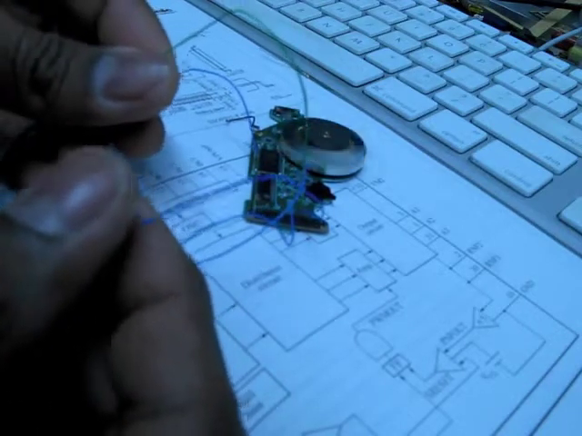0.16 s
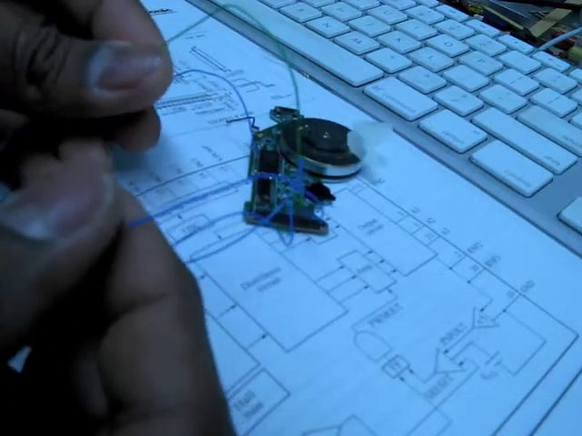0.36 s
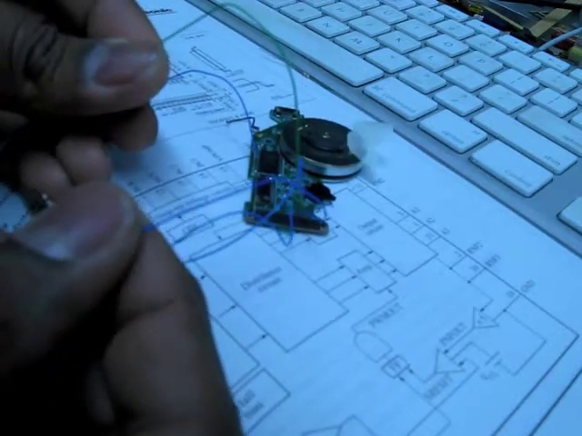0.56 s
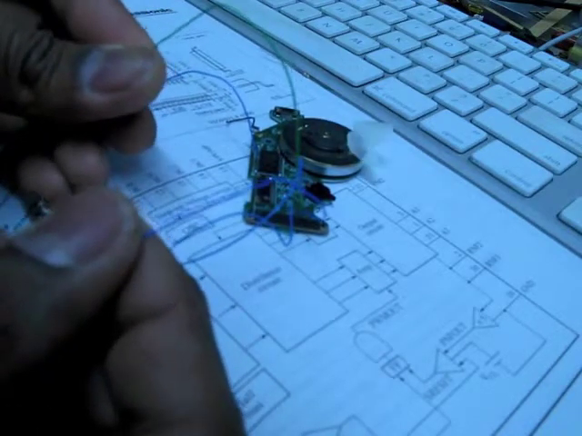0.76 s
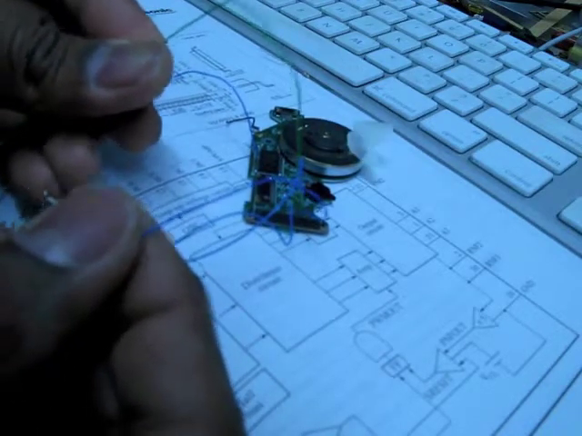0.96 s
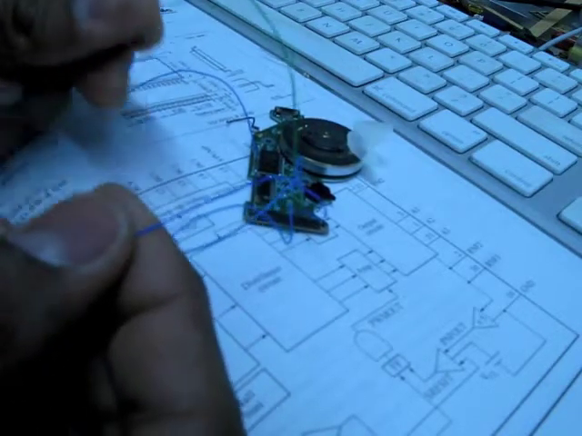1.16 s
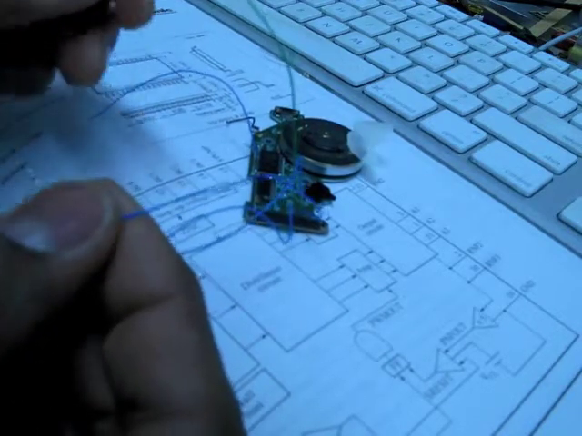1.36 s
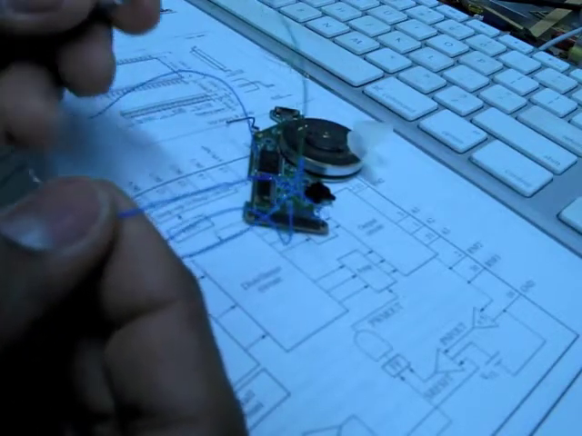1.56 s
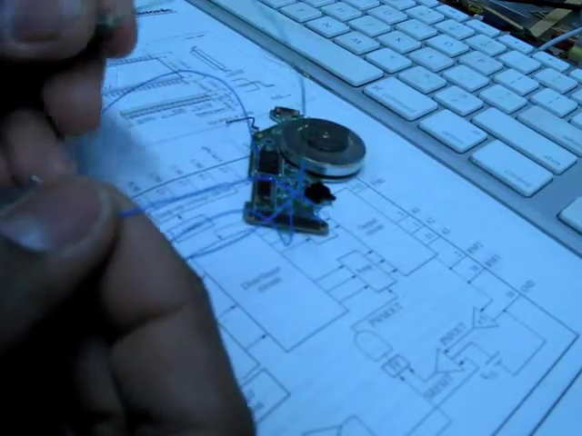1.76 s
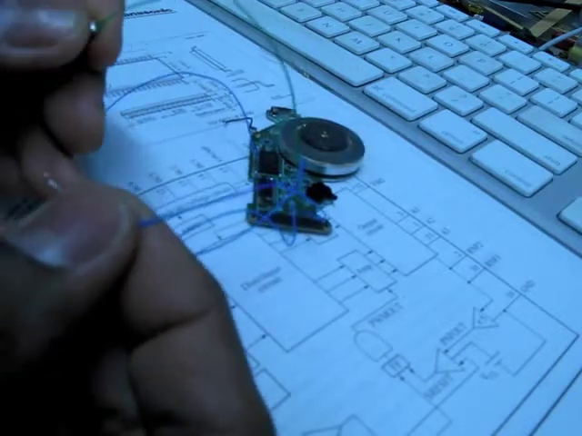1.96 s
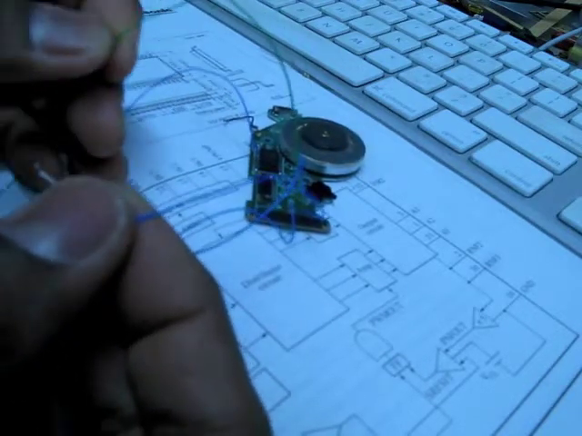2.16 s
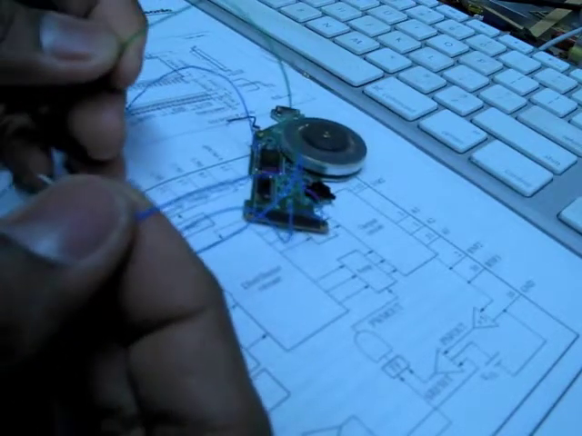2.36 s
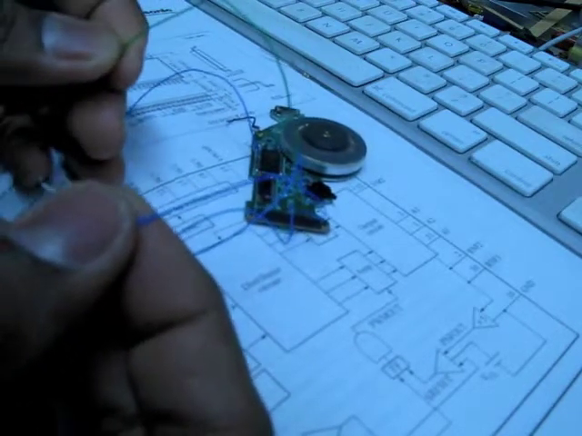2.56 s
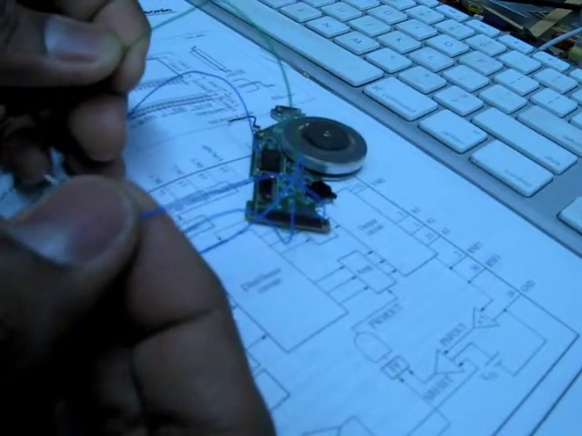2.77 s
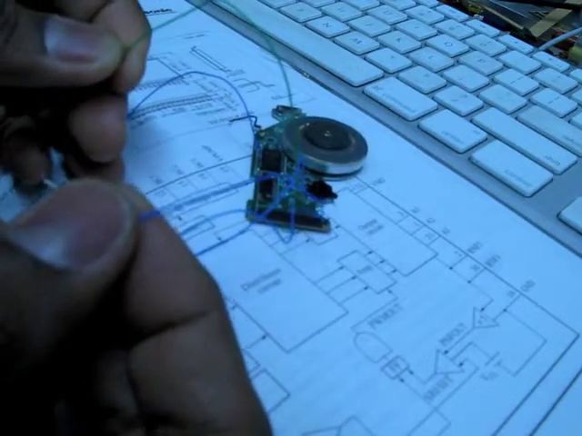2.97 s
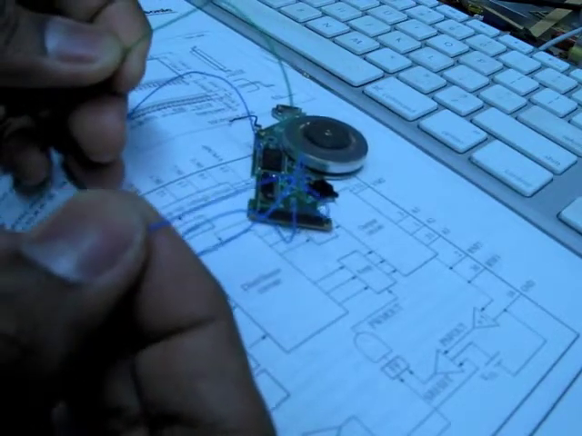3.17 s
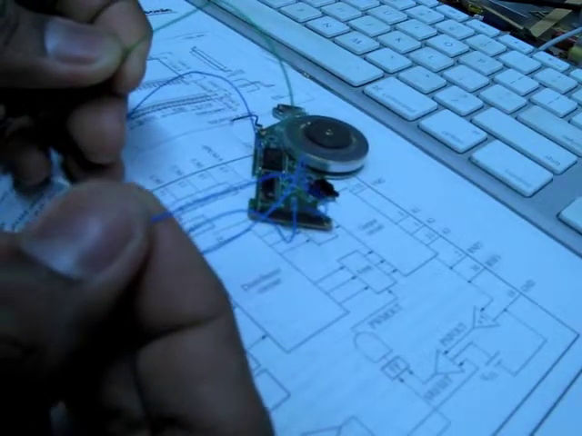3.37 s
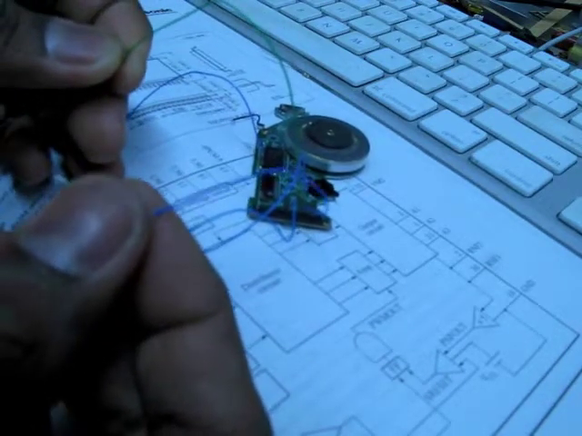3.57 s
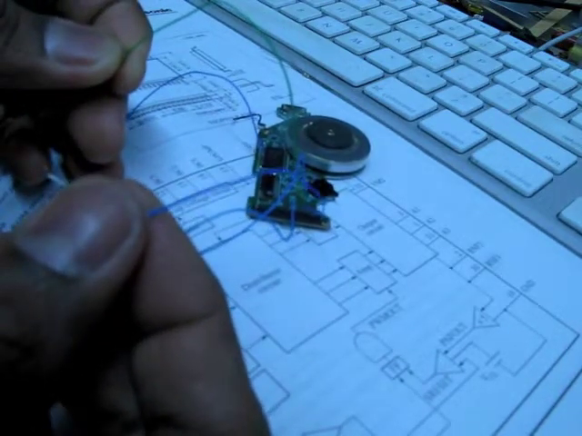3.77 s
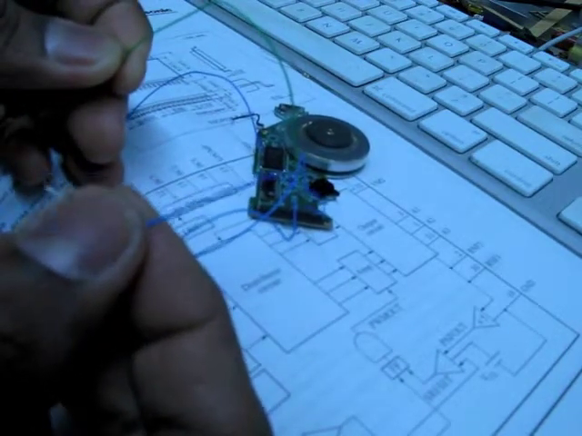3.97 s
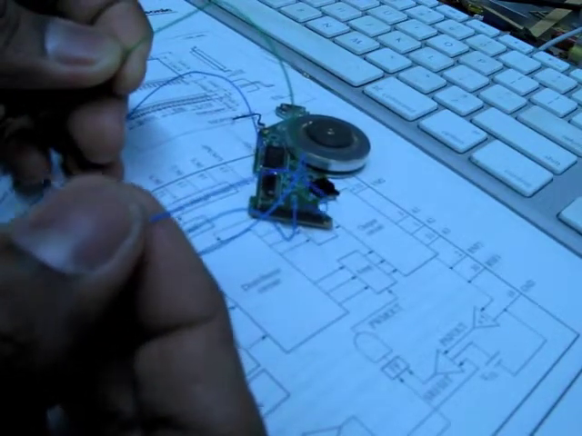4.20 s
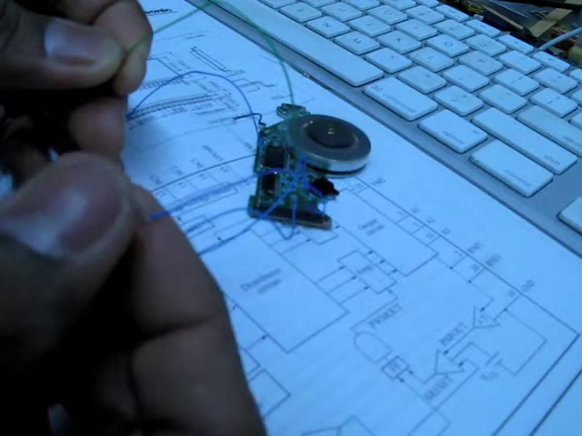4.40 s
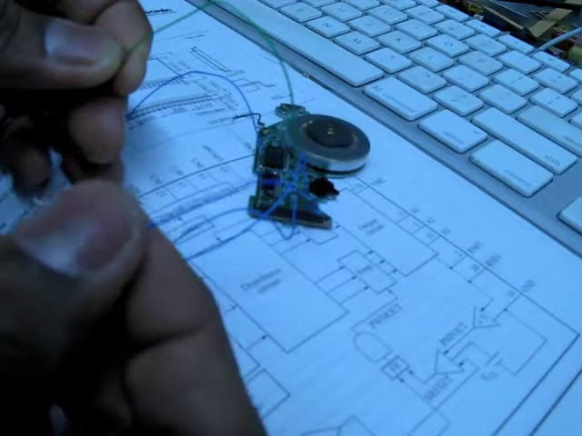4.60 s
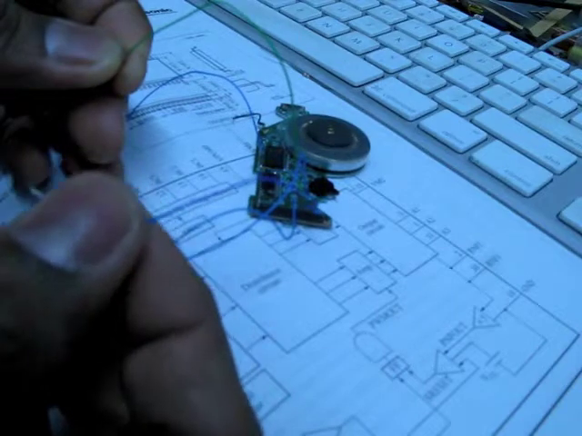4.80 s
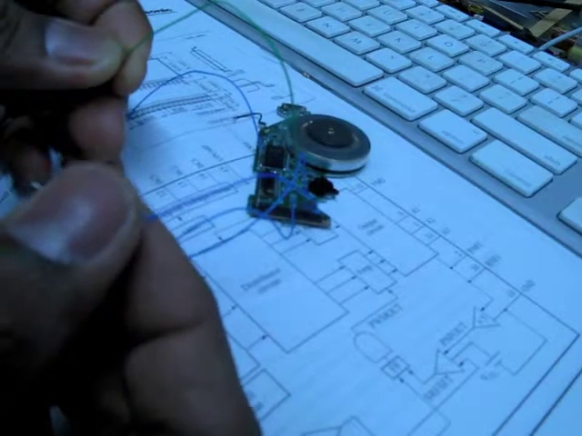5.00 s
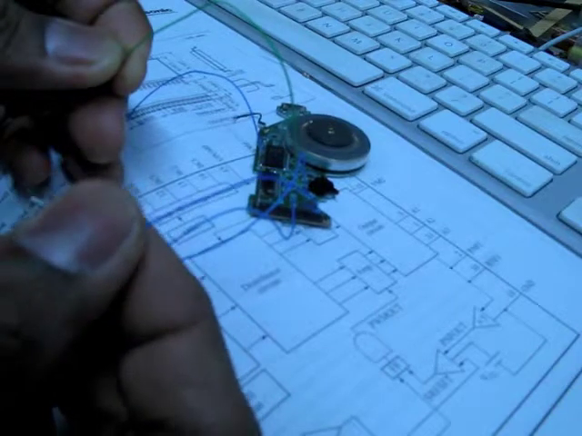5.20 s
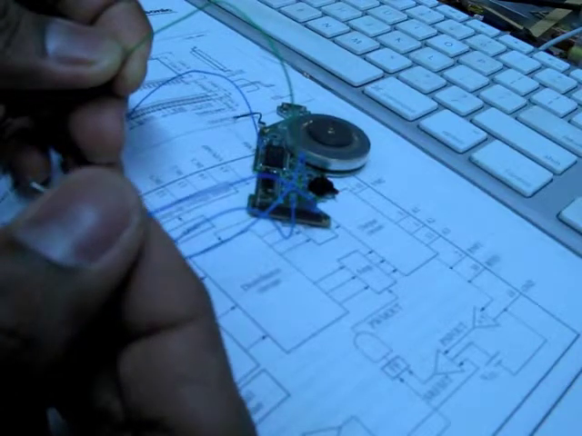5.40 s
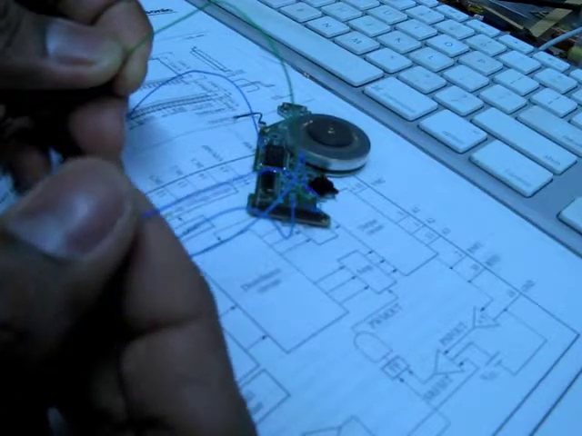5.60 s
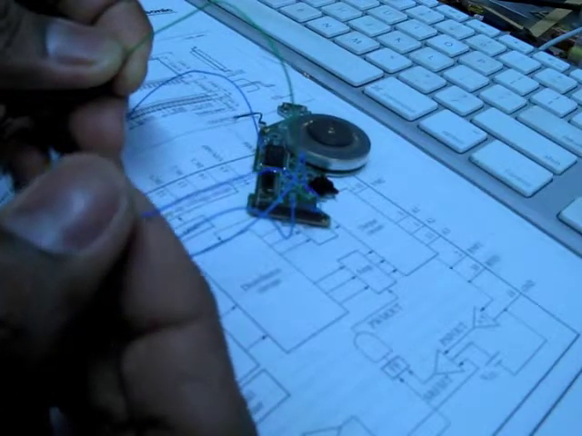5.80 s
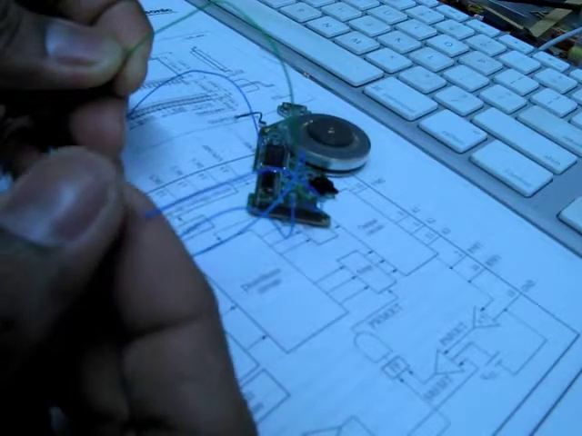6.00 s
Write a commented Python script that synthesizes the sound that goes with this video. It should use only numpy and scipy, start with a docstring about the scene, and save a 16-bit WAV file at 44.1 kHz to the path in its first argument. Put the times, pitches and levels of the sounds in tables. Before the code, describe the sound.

After faint wire ticks, a tiny motor spins up with a thin, high whine, cutting out briefly and restarting three times.

```python
"""A brushless motor fed through a hand-held wire

A small spindle motor on a desk makes four short runs and coasts in between. Cogging and commutation
whine at shaft orders, whole multiples of the rotation rate. The driver's current edges excite the
rotor's resonances, chiefly near 11 kHz: in a pattern that repeats each turn while it pulls at speed,
as a ragged sizzle while it sags. Fingers and wire tick faintly, and the small room hums softly."""
import sys
import numpy as np
from scipy import signal
from scipy.fft import rfft, irfft, next_fast_len
from scipy.io import wavfile
from scipy.ndimage import uniform_filter1d, map_coordinates

SR = 44100
rng = np.random.default_rng(int(sys.argv[2]) if len(sys.argv) > 2 else 0)


def to_wav(s):
    """Save 16-bit WAV."""
    ch = np.atleast_2d(s).T  # columns
    pcm = np.round(np.clip(ch, -1, 1) * 32767)  # PCM
    wavfile.write(sys.argv[1], SR, pcm.astype(np.int16))


N = 266805

# The runs, while the wire makes contact.
# Each row: start in seconds, stop in seconds, cogging gain in dB, commutation gain in dB.
RUNS = [(1.743, 2.286, -59, -54.5), (2.382, 3.525, -56, -56.5), (3.807, 4.285, -58, -57),
        (4.498, 6.2, -58, -56.5)]
# The spectrum of drive and bearing hiss. Each row: frequency in Hz, relative spectral density in dB.
HISS_SPECTRUM = [(300, -19), (800, -5), (1500, -3), (3200, 2), (5000, -1.5), (6800, 1.5), (9300, -2.5),
                 (12800, -7), (15500, -6)]


def motor():
    """Rotating machine noise: ring, hiss and whine need current; bearing and rotor hum need only motion."""
    speed, in_step = shaft()
    jitter = 0.00088 + 0.00196 * (1 - in_step)  # share of the speed, larger out of step
    turns = np.cumsum(speed * (1 + jitter * wobble(60))) / SR
    pace = speed / speed.max()
    ring = rotor_ring(turns, speed, pace, in_step)
    hiss = drive_hiss(turns, in_step)
    spinning = bearing(pace) + rotor_hum(turns, pace)
    powered = sum(contact(start, stop) for start, stop, _, _ in RUNS)
    return powered * (whine(turns, pace, in_step) + ring + hiss) + spinning


def shaft():
    """Inertia: speed relaxes toward each new target. Gives turns a second and lock to the drive, 0 to 1."""
    # The driver falls into step and pulls.
    # Each row: start in seconds, target in turns a second, time constant in seconds.
    pulls = [(1.731, 98.6, 0.099), (2.445, 98.6, 0.137), (2.976, 93.0, 0.027), (3.305, 95.7, 0.064),
             (3.806, 88.0, 0.278), (3.875, 94.8, 0.081), (4.496, 94.5, 0.081), (5.032, 94.5, 0.149)]
    # The driver loses step and the shaft sags. Each row: start in seconds, target in turns a second.
    slips = [(2.199, 82.2), (2.381, 86.2), (2.756, 87.2), (3.377, 84.0), (4.14, 82.8), (4.813, 84.1),
             (5.461, 83.5)]
    sag_s, coast_s, lock_s = 0.122, 1.06, 0.027  # two time constants; time to find or lose step
    max_acceleration = 435  # turns a second per second, at the driver's current limit
    changes = [(start, target, lag, 1) for start, target, lag in pulls]
    changes += [(start, target, sag_s, 0) for start, target in slips]
    changes += [(stop, 0, coast_s, 0) for _, stop, _, _ in RUNS]
    speed, in_step = np.zeros(N), np.zeros(N)
    for start, target, lag, locked in sorted(changes):
        i = round(start * SR)
        if i < N:
            reach = max_acceleration * lag  # a larger gap closes linearly, a smaller one exponentially
            gap = np.sinh((target - speed[i]) / reach) * np.exp(-np.arange(N - i) / SR / lag)
            speed[i:] = target - reach * np.arcsinh(gap)
            in_step[i:] = locked
    return np.abs(speed), np.clip(uniform_filter1d(in_step, size=round(lock_s * SR) + 1), 0, 1)


def contact(start, stop, ramp_s=0.0084):
    """Gating of the current: 1 while the wire touches and 0 otherwise, with short ramps."""
    t = np.arange(N) / SR
    return np.clip(np.minimum(t - start, stop - t) / ramp_s + 0.5, 0, 1)


def rotor_ring(turns, speed, pace, in_step):
    """Forced vibration: current edges, part periodic and part random, excite the rotor's modes."""
    # The rotor's modes. Each row: frequency in Hz, width in Hz, gain in dB.
    rotor_modes = [(6080, 700, -18), (7835, 315, -10.5), (11136, 755, -1.5), (15360, 480, -8)]
    # Critical speeds, where strong switching orders meet those modes.
    # Each row: speed and half width in turns a second, swell in dB when in step.
    critical_speeds = [(94.17, 1.84, 5.5), (82, 5.9, 1)]
    regular = filtered(switching(turns), lambda hz: modal_response(hz, rotor_modes))
    regular /= np.sqrt(np.abs(uniform_filter1d(regular ** 2, size=2048)) + 1e-9)  # hold the level even
    bursts = amp(2.4 * wobble(600) + 2.0 * np.sin(2 * np.pi * turns))  # uneven, yet following the shaft
    ragged = unit(filtered(bursts * rng.standard_normal(N), lambda hz: modal_response(hz, rotor_modes)))
    # The pattern forms as the shaft gathers speed, and settles only in step near full speed.
    regular_share = np.interp(speed, [62, 75, 90, 95], [0, 0.4, 0.4, 0.6])
    regular_share += in_step * np.interp(speed, [82, 91, 95], [0, 0.48, 0.3])
    ring = np.sqrt(regular_share) * regular + np.sqrt(1 - regular_share) * ragged
    swell_db = sum(db * np.exp(-((speed - centre) / width) ** 2) for centre, width, db in critical_speeds)
    swell_db *= amp(-6.5 * (1 - in_step))  # about half as many decibels out of step
    return amp(-39 + swell_db) * (pace + 0.017) ** 0.55 * ring


def switching(turns, size=8192, count=180):
    """Periodic excitation: current edges at the same shaft angles on every turn give a line spectrum."""
    # The strongest switching lines. Each row: shaft order, level in dB above an ordinary line.
    strong_orders = [(81, 7), (84, 16), (115, 9), (116, 16), (117, 5), (118, 6), (119, 13), (120, 7)]
    k = np.arange(count)
    strength = (k > count // 3) * np.where(k % 6 == 0, 2, 1.0)  # six poles a turn stand out
    for order, db in strong_orders:
        strength[round(order)] = amp(db)
    one_turn = irfft(strength * np.exp(2j * np.pi * rng.random(count)), size)
    return unit(np.interp(turns % 1, np.arange(size) / size, one_turn))


def whine(turns, pace, in_step):
    """Resonance: magnetic tones swell as they cross the bracket's modes, and little bass is radiated."""
    # The lines of cogging, commutation, passing magnet poles and a rotor that lags its drive.
    # Each row: shaft order, base level in dB.
    cogging_lines = [(17, -8), (18, -1.3)]
    commutation_lines = [(36, 0), (54, -8), (72, -3), (108, -10)]
    pole_lines = [(24, -69.5), (30, -62), (42, -60.5), (48, -62), (60, -63), (66, -64), (78, -65),
                  (90, -66), (138, -72)]
    lag_lines = [(54, -67.5), (90, -61)]
    # The modes of the motor's bracket. Each row: frequency in Hz, width in Hz, gain in dB.
    bracket_modes = [(1506, 13, 9.5), (1682, 20, 0.5), (2040, 390, 3.5), (2775, 38, -1), (3220, 100, 0.5),
                     (3430, 160, -2.5), (4290, 85, 2.5), (4950, 250, -2.5), (5810, 80, 6), (5930, 520, 3),
                     (5980, 81, 3), (7700, 130, 15)]
    slip = 1 - in_step
    cogging = sum(amp(db) * contact(start, stop) for start, stop, db, _ in RUNS)
    commutation = sum(amp(db) * contact(start, stop) for start, stop, _, db in RUNS)
    commutation *= amp(0.5 * (1 - pace) - 7 * slip)  # a slow rotor draws more current; weaker out of step
    tones = cogging * pace ** 2 * order_tones(cogging_lines, turns, flutter_db=0.5)
    tones += commutation * order_tones(commutation_lines, turns, flutter_db=0.9)
    tones += amp(-4 * slip) * pace ** 2 * order_tones(pole_lines, turns, flutter_db=2.5)
    tones += slip * order_tones(lag_lines, turns, flutter_db=2.0)

    def radiation(hz, cutoff_hz=1350):
        bass_loss = np.sqrt(1 + (cutoff_hz / (hz + 1)) ** 24)
        return (1 + np.abs(modal_response(hz, bracket_modes))) / bass_loss

    return filtered(tones, radiation)


def drive_hiss(turns, in_step):
    """Amplitude modulation: the powered motor's hiss flickers, and pulses once a turn."""
    hiss = noise(HISS_SPECTRUM)
    flicker = amp(1.6 * wobble(700) + 0.47 * np.sin(2 * np.pi * turns))
    return amp(-47 - in_step) * unit(hiss * flicker)


def bearing(pace):
    """Broadband bearing noise, its amplitude growing as the square of the speed."""
    return amp(-50) * pace ** 2 * noise(HISS_SPECTRUM)


def rotor_hum(turns, pace):
    """Periodic forcing: unbalance gives a low hum, and nine stator teeth a faint higher tone."""
    # The spinning rotor's tones. Each row: shaft order, level in dB at full speed.
    rotor_lines = [(1, -68), (2, -69.5), (9, -68)]
    return pace ** 4 * order_tones(rotor_lines, turns, flutter_db=-2.4)


def ticks():
    """Damped transients: fingers, wire and starting rotor give noise bursts that decay exponentially."""
    # Ticks and scuffs. Each row: start in seconds, initial level in dB, centre in Hz, T60 in seconds.
    touches = [(.407, -59, 13500, .015), (.979, -59, 13500, .02), (1.005, -53, 13000, .03),
               (1.07, -51, 12000, .04), (1.084, -55.5, 3000, 0.6), (1.38, -57, 13000, .08),
               (1.513, -57, 13500, .05), (1.615, -57, 14000, .04), (1.739, -44, 11000, 0.016),
               (1.785, -38, 4500, .016), (1.826, -39, 2600, .02), (1.85, -46, 2500, 0.013),
               (2.21, -52.5, 760, 0.99), (4.497, -37, 11000, 0.025)]
    out, t = np.zeros(N + SR), np.arange(SR // 4) / SR
    for start, db, centre, t60 in touches:
        burst = unit(filtered(rng.standard_normal(len(t)), lambda hz: resonance(hz, centre, 1.8 * centre)))
        out[round(start * SR):][:len(t)] += amp(db - 60 * t / t60) * burst
    return out[:N]


def reverberation(x):
    """Diffuse reflection: the walls add a noise-like tail that lasts longest in the bass."""
    # The room's reverberation times. Each row: frequency in Hz, T60 in seconds.
    decay_times = [(200, 0.32), (2000, 0.18), (12000, 0.23)]
    hz, t, spectrum = signal.stft(rng.standard_normal(SR // 2), SR, nperseg=256)
    decay = amp(-60 * t / along(decay_times, hz)[:, None])
    tail = signal.istft(spectrum * decay, SR, nperseg=256)[1]
    impulse_response = np.pad(tail, (150, 0)) / np.linalg.norm(tail)  # 3.4 ms behind the direct sound
    return signal.fftconvolve(x, impulse_response)[:N]


def room_tone():
    """Ambient noise: a gently wavering continuous spectrum of air, with the lines of mains hum."""
    # The room's air noise. Each row: frequency in Hz, relative spectral density in dB.
    air_spectrum = [(15, -63), (25, -41), (91, -8), (104, -6), (122, -4), (144, -4), (227, -3.5),
                    (399, -3.5), (582, -4), (666, -3), (970, -5.5), (1530, -7.5), (1950, -8.5),
                    (12500, -20.5), (15500, -27.5)]
    # Mains harmonics. Each row: frequency in Hz, level in dB.
    mains_lines = [(120, -70), (240, -70.5)]
    t = np.arange(N) / SR
    hum = sum(amp(db) * np.sqrt(2) * np.sin(2 * np.pi * (hz * t + rng.random())) for hz, db in mains_lines)
    return amp(-51.88 + 0.54 * wobble(6.5)) * noise(air_spectrum) + hum


def order_tones(lines, turns, flutter_db):
    """Harmonic series: sines on multiples of the shaft angle, each fluttering in level on its own."""
    tones = np.zeros(N)
    for order, db in lines:
        gain = amp(db + flutter_db * wobble(40))
        tones += gain * np.sin(2 * np.pi * (round(order) * turns + rng.random()))
    return np.sqrt(2) * tones


def modal_response(hz, modes):
    """Superposition: the complex responses of the modes add."""
    return sum(amp(db) * resonance(hz, centre, width) for centre, width, db in modes)


def resonance(hz, centre, width):
    """Two equal damped resonators in cascade, each width Hz wide: a causal peak with steep skirts."""
    return (1j * hz * width / (centre ** 2 - hz ** 2 + 1j * hz * width)) ** 2


def noise(spectrum):
    """Spectral shaping: white noise becomes coloured noise of rms 1."""
    return unit(filtered(rng.standard_normal(N), lambda hz: amp(along(spectrum, hz))))


def filtered(x, response):
    """Linear filtering: the spectrum of x is multiplied by a function of frequency."""
    size = next_fast_len(len(x) + SR // 2)
    return irfft(rfft(x, size) * response(np.fft.rfftfreq(size, 1 / SR)), size)[:len(x)]


def wobble(rate):
    """Random modulation: a smooth curve through rate Gaussian values a second."""
    return map_coordinates(rng.standard_normal(int(N * rate / SR) + 4), [np.arange(N) * rate / SR])


def along(points, hz):
    """Interpolation of (Hz, value) points on a logarithmic frequency axis."""
    frequencies, values = np.transpose(points)
    return np.interp(np.log(hz + 1), np.log(frequencies + 1), values)


def amp(db):
    """Decibels as an amplitude ratio."""
    return 10 ** (np.asarray(db) / 20)


def unit(x):
    """Normalisation to rms 1."""
    return x / np.sqrt(np.mean(x ** 2) + 1e-20)


def scene():
    """Direct and reverberant fields of the nearby motor and wire add to the quiet room's own noise."""
    direct = motor() + ticks()
    return (direct + amp(-12.3) * reverberation(direct) + room_tone())[None]


def record(dry):
    """Band limiting: an ideal low-pass filter removes the highest treble."""
    top_hz = 15760
    return np.array([filtered(channel, lambda hz: hz < top_hz) for channel in dry])


dry = scene()
out = record(dry)
to_wav(out)
```